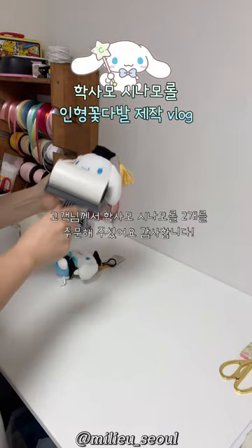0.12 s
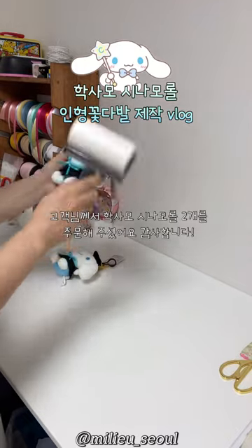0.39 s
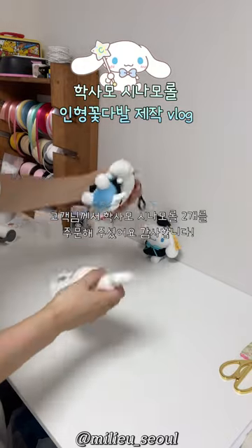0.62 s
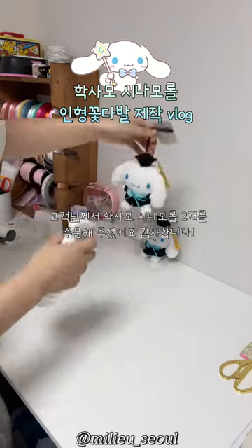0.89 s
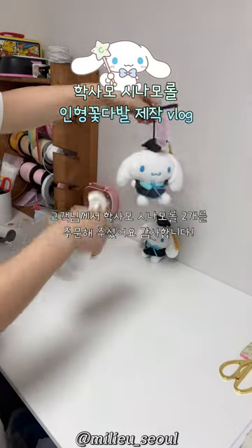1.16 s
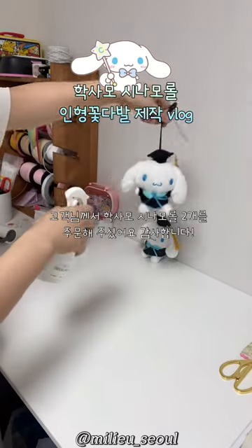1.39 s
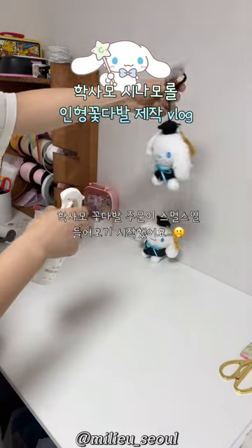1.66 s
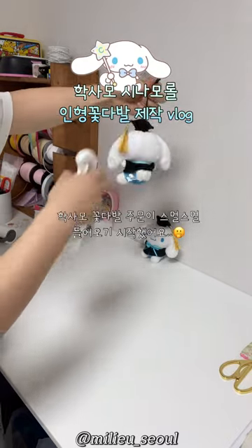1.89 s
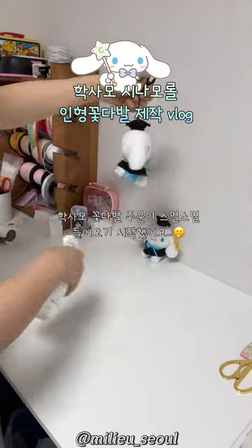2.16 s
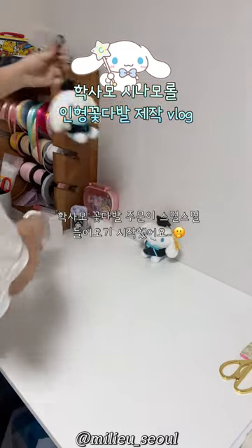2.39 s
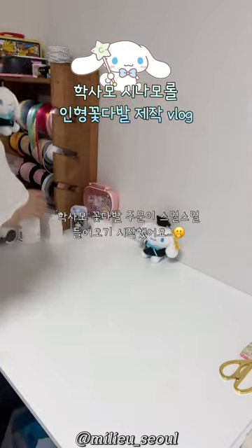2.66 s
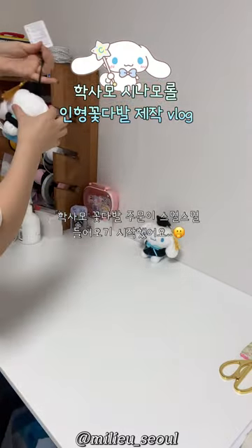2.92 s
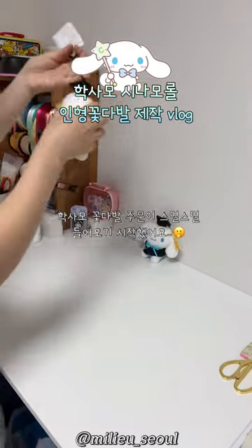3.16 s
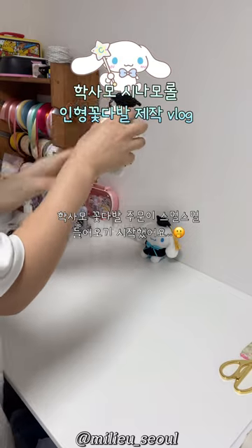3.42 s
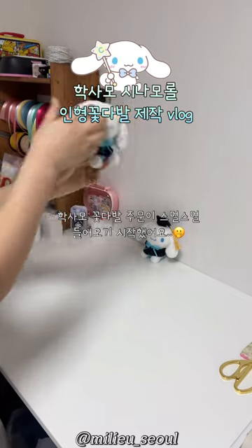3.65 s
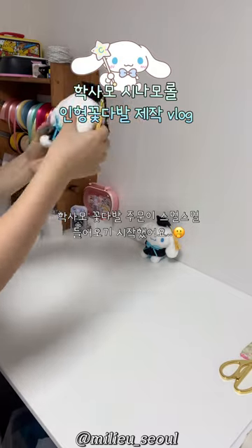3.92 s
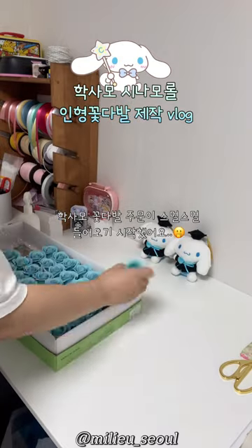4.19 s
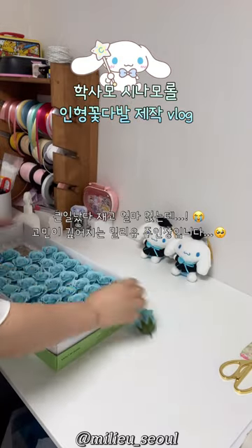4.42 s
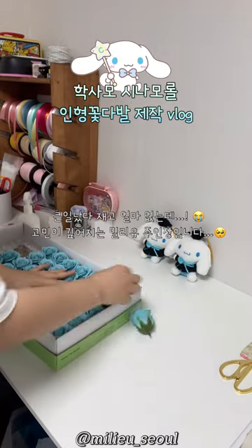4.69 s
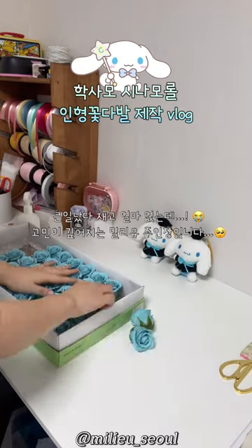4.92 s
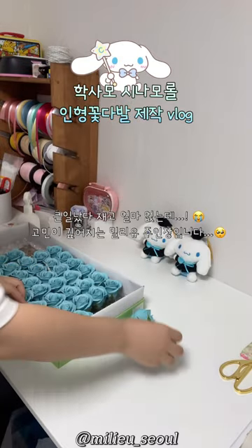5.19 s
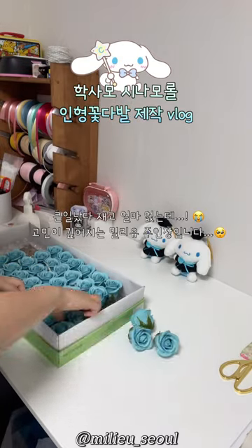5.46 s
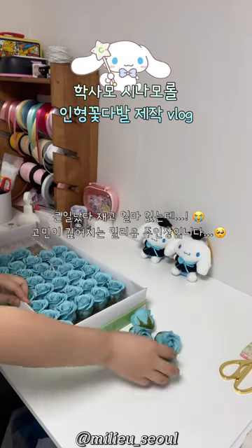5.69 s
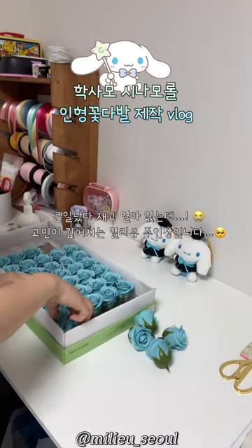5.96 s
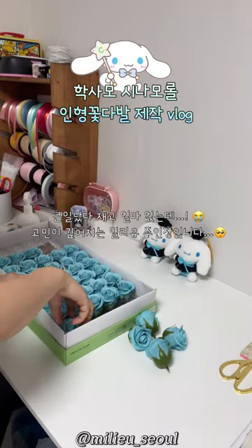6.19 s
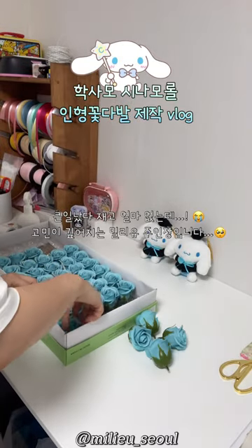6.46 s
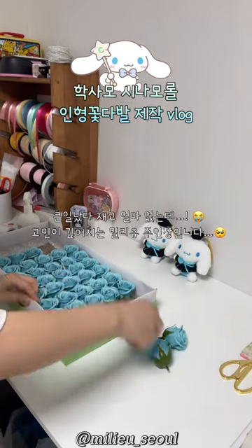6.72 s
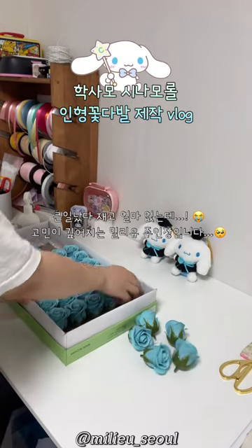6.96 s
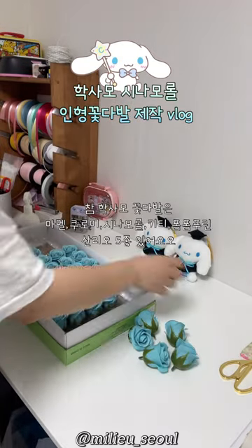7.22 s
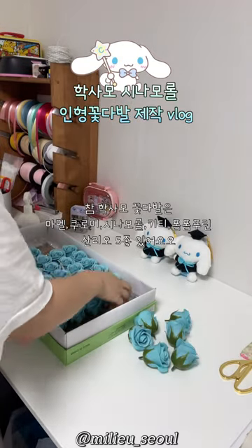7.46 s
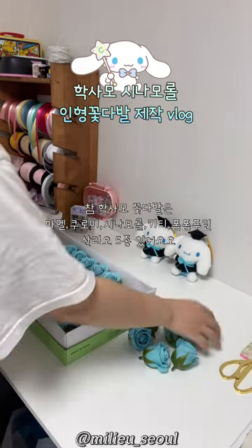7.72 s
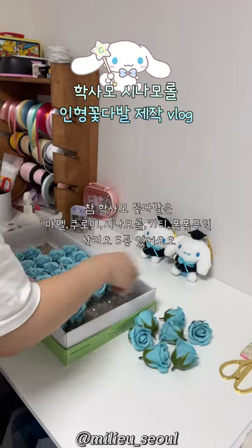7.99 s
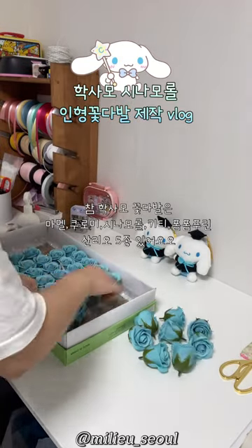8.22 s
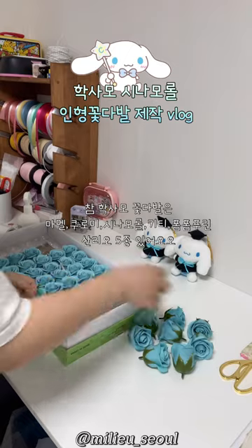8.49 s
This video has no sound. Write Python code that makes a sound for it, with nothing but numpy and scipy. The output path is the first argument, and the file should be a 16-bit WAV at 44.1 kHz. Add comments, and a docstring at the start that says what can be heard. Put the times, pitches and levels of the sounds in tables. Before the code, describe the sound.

Close to the microphone in a small workroom, hands handle light things with small plastic clicks, and a spray bottle gives two very short puffs. The bottle knocks and scrapes onto the table. After a quieter pause with a few ticks, a thin plastic tray snaps loudly and crackles in uneven bursts as artificial roses are pulled out, with soft rustles and dull box bumps. Faint hum and hiss continue underneath.

```python
"""Artificial roses are pulled from a thin plastic tray, whose buckling radiates snaps: short bursts of noise
with a hollow ring. Before that, hands brush and spray plush toys (shaped noise) and a spray bottle is set
down on the table, whose modes ring under each blow. Strokes crackle as trains of uneven grains.
A faint machine hum and hiss, both filtered noise, fill the small workroom; its walls answer briefly."""
import sys
import numpy as np
from scipy import signal
from scipy.fft import rfft, irfft, next_fast_len
from scipy.io import wavfile
from scipy.ndimage import uniform_filter1d, map_coordinates

SR = 44100
rng = np.random.default_rng(int(sys.argv[2]) if len(sys.argv) > 2 else 0)


def volts_from_decibels(level):
    """Turn decibel levels (scalar or array-like) into linear amplitude factors."""
    exponent = np.asarray(level, float) / 20
    return 10 ** exponent


def put_to_file(sound):
    """Save the sound as 16-bit audio at rate SR, in the file named by the first command-line argument."""
    columns = np.atleast_2d(sound).T  # one column per channel
    safe = np.clip(columns, -1, 1)
    whole_steps = np.round(safe * 32767)
    wavfile.write(sys.argv[1], SR, whole_steps.astype(np.int16))


N = 379701


def unit(x):
    """Normalisation: scales a signal to rms 1."""
    return x / np.sqrt(np.mean(x ** 2) + 1e-20)


def along(points, hz):
    """Logarithmic pitch scale: interpolates (f/Hz, value) points over log frequency."""
    f, value = np.transpose(points)
    return np.interp(np.log(hz + 1), np.log(f + 1), value)


def curves(rows):
    """Envelope: one value per sample for each column after the time; -120 outside."""
    s, *columns = np.transpose(rows)
    return [np.interp(np.arange(N) / SR, s, c, left=-120, right=-120) for c in columns]


def filtered(x, response):
    """Linear filtering: the spectrum of x times a complex response of frequency."""
    size = next_fast_len(x.shape[-1] + 8192)
    spectrum = rfft(x, size) * response(np.fft.rfftfreq(size, 1 / SR))
    return irfft(spectrum, size)[..., :x.shape[-1]]


def resonant(modes):
    """Modal superposition: causal response of (f/Hz, width/Hz, level/dB) resonances of alternating sign."""
    def response(f):
        return sum((-1) ** k * volts_from_decibels(db) * 1j * f * width / (centre ** 2 - f * f + 1j * f * width)
                   for k, (centre, width, db) in enumerate(modes))
    return response


def noise(spectrum, grit_db, per_s):
    """Modulated noise: coloured, rms 1, its level gliding between per_s random values a second."""
    drift = map_coordinates(rng.standard_normal(N), [np.arange(N) * per_s / SR], order=1)
    coloured = filtered(rng.standard_normal(N), lambda hz: volts_from_decibels(along(spectrum, hz)))
    return unit(volts_from_decibels(grit_db * drift) * coloured)


# machine tones: f/Hz, width/Hz, level/dB
HUM = [(118, 12, -70), (3758, 40, -88), (4760, 120, -92), (5050, 40, -89)]
# colour of the room hiss: f/Hz, relative level/dB
AIR = [(30, -41), (55, -15.5), (118, -7.5), (200, -18), (490, -25), (850, -32), (2600, -42.5), (4500, -38),
       (7000, -44), (16000, -43.5)]
# stereo spread of the hiss: f/Hz, side over mid amplitude
AIR_APART = [(100, .1), (400, .55), (1300, 1.9), (4400, 1.1), (15000, .15)]


def air():
    """Stationary noise: diffuse hiss, with the wavering hum and whine of a machine as narrow bands."""
    hiss_db = -65
    hum = 0
    for hz, width, db in HUM:
        hum = hum + volts_from_decibels(db) * unit(filtered(rng.standard_normal(N), resonant([(hz, width, 0)])))
    mid, side = (noise(AIR, grit_db=1.5, per_s=8) for _ in range(2))
    side = filtered(side, lambda hz: along(AIR_APART, hz))
    return hum + volts_from_decibels(hiss_db) * np.array([mid + side, mid - side])


# decay of the near walls' answer: f/Hz, t60/s
WALLS = [(300, 0.17), (1400, 0.023), (3700, 0.064), (10000, 0.048)]
# stereo spread of the echoes: f/Hz, side over mid amplitude
APART = [(200, .02), (1000, .25), (4400, 0.99), (14000, 0.28)]


def room(x, piece=2048):
    """Reverberation: each moment gets its own short noise tail, each frequency dying at its own speed."""
    pieces = np.pad(x, (0, -N % piece)).reshape(-1, piece)
    hz, t, z = signal.stft(rng.standard_normal((2, len(pieces), 3 * piece)), SR, nperseg=128)
    z[1] *= along(APART, hz)[:, None]
    # near walls answer first; the whole room hums on more faintly
    near_walls = volts_from_decibels(-60 * t / along(WALLS, hz)[:, None])
    whole_room = volts_from_decibels(-30 - 60 * t / .3) * np.cos(t / t[-1] * np.pi / 2)
    tails = signal.istft(z * (near_walls + whole_room), SR, nperseg=128)[1][..., :3 * piece]
    tails = tails / np.linalg.norm(tails[0], axis=-1, keepdims=True)
    wet = signal.fftconvolve(pieces[None], tails, axes=2)
    out = np.zeros((2, (len(pieces) + 4) * piece))
    for k, tail in enumerate(wet.swapaxes(0, 1)):
        out[:, k * piece:][:, :tail.shape[1]] += tail
    delay = round(.0025 * SR)
    mid, side = np.pad(out, ((0, 0), (delay, 0)))[:, :N]
    return np.array([mid + side, mid - side])


# modes of the table top: f/Hz, level/dB, t60/s
TABLE = [(128, -21, .14), (238, -12, .08), (281, 0, .19), (490, -14, .04), (780, -13, .035),
         (1300, -16, .02)]


def wood(force, spread_db=0):
    """Forced vibration: a force drives the table's modes; the spot struck sets their strengths."""
    modes = []
    for hz, db, t60 in TABLE:
        width = np.log(1000) / (np.pi * t60)
        modes.append((hz, width, db + spread_db * rng.standard_normal()))
    return filtered(force, resonant(modes))


def knocks(rows, stop_s, spread_db, rattle_db=-120):
    """Impact: a soft push rings the table until something resting on it damps the modes."""
    rattle_s = .015  # a light thing does not land at once: uneven pushes follow the first
    out, t = np.zeros(N + SR), np.arange(SR // 5) / SR
    for s, db, free_s, soft_s in rows:
        late = rattle_s * rng.random((4, 1))
        size = volts_from_decibels(rattle_db) * rng.standard_normal((4, 1))
        first = np.exp(-(t / soft_s - 2) ** 2)
        later = (size * np.exp(-((t - late) / soft_s - 2) ** 2)).sum(axis=0)
        ring = wood(first + later, spread_db)
        damping = np.exp(-np.clip(t - free_s, 0, None) / stop_s)
        out[round(s * SR):][:len(t)] += volts_from_decibels(db) * ring / np.std(ring[:SR // 50]) * damping
    return out[:N]


# colour of a click's bright burst: f/Hz, relative level/dB
CRACK = [(150, -46.5), (700, -17), (1500, -4), (2600, 3), (5500, -2.5), (8000, -1.5), (13000, -2),
         (15600, -5), (16500, -67.5)]


def clicks(rows, hollow, t60, colour_db, crack_db, body_db):
    """Transient radiation: a short bright burst with its own strongest band, a duller one in the hollow."""
    spike_db, spike_t60_s = 4, 0.0069  # the first break stands out of its burst
    out, t = np.zeros(N + SR), np.arange(SR // 20) / SR
    for s, db, bright_hz, low_db in rows:
        decay = volts_from_decibels(-60 * t / [[t60], [1.41 * t60]])
        burst = rng.standard_normal((2, len(t))) * decay * (1 - np.exp(-t / 0.0002))
        burst[0] *= 1 + volts_from_decibels(spike_db - 60 * t / spike_t60_s)
        colour = resonant([(bright_hz, 0.16 * bright_hz, colour_db)])
        crack = filtered(burst[0], lambda hz: volts_from_decibels(along(CRACK, hz)) + colour(hz))
        body = filtered(burst[1], resonant(hollow))
        hit = volts_from_decibels(crack_db) * crack / np.abs(crack).max()
        hit = hit + volts_from_decibels(low_db + body_db) * body / np.abs(body).max()
        out[round(s * SR):][:len(t)] += volts_from_decibels(db) * hit
    return out[:N]


def with_hollow(rows, top_db, per_db, scatter_db):
    """Hardness law: the harder a click, the brighter; the hollow gains per_db for each dB softer."""
    luck = rng.standard_normal(len(rows))
    return [(s, db, hz, top_db - per_db * db + scatter_db * u) for (s, db, hz), u in zip(rows, luck)]


# bands that grains favour, one each: f/Hz
GRAIN_HZ = [1900, 3000, 4600, 7480, 12000]


def crackle(spectrum, per_s, spread_db, bed_db):
    """Granular noise of rms 1: tiny breaks of very uneven size and colour over a smooth bed."""
    peak_db, grain_t60_s = 2, 0.01
    sizes = volts_from_decibels(spread_db * np.minimum(rng.exponential(size=N), 2.5))
    breaks = (rng.random(N) < per_s / SR) * sizes
    family = rng.integers(len(GRAIN_HZ), size=N) == np.arange(len(GRAIN_HZ))[:, None]
    shape = signal.lfilter([1], [1, -volts_from_decibels(-60 / SR / grain_t60_s)], breaks * family)
    grains = unit(shape) * np.sqrt(1 / len(GRAIN_HZ)) * rng.standard_normal(N)
    tinted = filtered(grains, lambda hz: [1 + resonant([(c, .35 * c, peak_db)])(hz) for c in GRAIN_HZ])
    mixed = tinted.sum(axis=0) + volts_from_decibels(bed_db) * rng.standard_normal(N)
    return unit(filtered(mixed, lambda hz: volts_from_decibels(along(spectrum, hz))))


# length and level of each spray: t/s, length/s, hiss level/dB
SPRAY = [(1.054, 0.066, -37), (1.949, 0.062, -38)]
# colour of the mist: f/Hz, relative level/dB
MIST = [(470, -61), (800, -28), (1780, -15.5), (13000, -2), (15900, -2.5), (16500, -36.5)]


def spray():
    """Jet noise: the trigger clacks as a damped sine, then mist hisses while the pump stroke lasts."""
    clack_hz, clack_db, clack_t60_s = 1194, -35, 0.036
    t, gate, clack = np.arange(N) / SR, np.zeros(N), np.zeros(N)
    for s, length, db in SPRAY:
        age = np.clip(t - s, 0, None)
        fall_db = 700 * np.clip(age - length, 0, None)
        gate += volts_from_decibels(db - fall_db) * (1 - np.exp(-age / 0.02))
        clack += volts_from_decibels(clack_db - 60 * age / clack_t60_s) * np.sin(2 * np.pi * clack_hz * age)
    return gate * noise(MIST, grit_db=1, per_s=300) + clack


# clear clicks of toys, tags and bottle in the hands: t/s, nominal level/dB, brightest f/Hz
TICKS = [(0.076, -33, 6800), (0.1532, -43, 2230), (0.1955, -42, 14400), (0.299, -43, 4740),
         (0.3394, -49.5, 2370), (0.435, -40.5, 5190), (0.4552, -41.5, 4000), (0.5275, -33, 5900),
         (0.674, -43, 2430), (0.704, -27, 4170), (0.712, -23.5, 2350), (0.7908, -33.5, 3940),
         (0.8056, -14, 4860), (0.8789, -43.5, 4900), (0.8924, -43, 3800), (0.9353, -44, 3850),
         (0.9664, -42, 11500), (0.978, -34.5, 8240), (1.0241, -34, 4940), (1.0528, -21.5, 4070),
         (1.2058, -42.5, 9400), (1.264, -41.5, 2280), (1.292, -49, 2890), (1.3935, -40, 8000),
         (1.516, -42, 4230), (1.527, -36, 4230), (1.6943, -45, 3770), (1.783, -51.5, 7740),
         (1.8836, -40.5, 3760), (1.9313, -36.5, 4820), (1.952, -23.5, 13800), (2.1168, -46, 5460),
         (2.154, -47.5, 7000), (2.377, -38, 10600), (2.397, -34, 3560), (3.2124, -27, 4730),
         (3.3207, -33, 4300), (3.3544, -24, 2710), (3.4346, -39.5, 3820), (3.7016, -36.5, 5450),
         (3.7983, -45, 2640), (3.9285, -38.5, 2370), (4.0277, -27, 4600), (4.0632, -41.5, 2410)]
# hollow plastic of roller and bottle: f/Hz, width/Hz, level/dB
SHELL = [(670, 100, 2), (1330, 110, -4.5)]


def ticks():
    """Contact transients: light things click in the hands and excite hollow plastic."""
    rows = with_hollow(TICKS, top_db=-19.5, per_db=0.044, scatter_db=1.7)
    return clicks(rows, SHELL, t60=0.026, colour_db=6, crack_db=-2.5, body_db=-6.5)


# the bottle's foot strikes the table: t/s, level/dB, time until its weight stops the ring/s, clack level/dB
BOTTLE = [(2.4625, -19, .02, -20), (2.536, -33, .03, -36), (2.584, -25, .011, -23), (2.5955, -19, .11, -21)]
# the bottle slides: t/s, table rumble level/dB, scrape level/dB
DRAG = [(2.46, -54.5, -35.5), (2.49, -44.5, -45.5), (2.53, -39.5, -44), (2.555, -32, -38.5),
        (2.575, -45.5, -52), (2.635, -33.5, -44), (2.67, -59, -79)]
# colour of the scrape: f/Hz, relative level/dB
SCRAPE = [(600, -25), (1200, -5.5), (2300, -1.5), (4000, -6), (16000, -23.5)]


def bottle():
    """Impact and friction: blows on the table, each with the foot's dull clack, and a rough slide."""
    rumble_db, scrape_db = curves(DRAG)
    rubbing = noise([(100, 9), (2000, 2.5)], grit_db=-1, per_s=390)
    rumble = volts_from_decibels(rumble_db) * unit(wood(rubbing))
    scrape = volts_from_decibels(scrape_db) * crackle(SCRAPE, per_s=1100, spread_db=9.5, bed_db=-5.5)
    contact_s = .0003
    blows = knocks([(*row[:3], contact_s) for row in BOTTLE], stop_s=.004, spread_db=0)
    foot_rows = [(s, db, 2200, -3) for s, _, _, db in BOTTLE]
    foot = clicks(foot_rows, SHELL, t60=0.0084, colour_db=28.5, crack_db=0.5, body_db=-5.5)
    return blows + foot + rumble + scrape


# strokes of the hands over plush, then over petals and tray: start t/s, end t/s, rustle level/dB
STROKES = [(0, 0.017, -51.5), (0.057, 0.174, -61.5), (0.424, 0.647, -67), (0.958, 1.02, -60),
           (2.299, 2.359, -66), (2.377, 2.424, -53.5), (3.54, 3.644, -73.5), (3.866, 3.888, -65.5),
           (4.111, 4.15, -40.5), (4.132, 4.188, -55.5), (4.192, 4.253, -64.5), (4.279, 4.368, -59.5),
           (4.471, 4.589, -46), (4.604, 4.689, -45.5), (4.703, 4.882, -56.5), (4.901, 5.018, -55.5),
           (5.028, 5.081, -39), (5.192, 5.255, -52.5), (5.351, 5.432, -55.5), (5.436, 5.541, -45),
           (5.657, 5.884, -53), (5.894, 6.192, -57.5), (6.19, 6.437, -55.5), (6.46, 6.505, -50),
           (6.521, 6.63, -46.5), (6.734, 6.797, -57), (6.893, 6.995, -53), (7.013, 7.143, -56),
           (7.128, 7.189, -44), (7.328, 7.36, -69), (7.438, 7.509, -50.5), (7.556, 7.562, -34),
           (7.681, 7.751, -69), (7.857, 7.907, -54), (7.917, 7.978, -47), (8.086, 8.231, -63.5),
           (8.27, 8.365, -56), (8.383, 8.442, -45.5), (8.537, 8.601, -60.5)]


def stroking():
    """Amplitude envelope: the hands' rubbing at each sample, its edges smoothed."""
    level = np.zeros(N)
    for start, end, db in STROKES:
        level[round(start * SR):round(end * SR)] += volts_from_decibels(db)
    return uniform_filter1d(level, round(0.013 * SR))


def patchy(x, depth_db):
    """Time-frequency modulation: random gain in patches over a kilohertz wide and about 40 ms long."""
    z = signal.stft(x, nperseg=256)[2]
    field = uniform_filter1d(rng.standard_normal(z.shape), size=8, axis=0)
    field = uniform_filter1d(field, size=14, axis=1)
    return unit(signal.istft(z * volts_from_decibels(depth_db * unit(field)), nperseg=256)[1][:N])


# colour of the rustle: f/Hz, relative level/dB
RUSTLE = [(1000, -31), (1800, 6.5), (5200, 3), (8000, -0.5), (13000, -1.5), (15800, -4), (16500, -32)]
# hollow of tray and box: f/Hz, width/Hz, level/dB
BODY = [(706, 270, -16.5), (1298, 310, 12.5), (390, 170, 3)]


def hands():
    """Friction: each stroke crackles, and rubs the hollow tray and the table under it."""
    tray_from_s = 4.106  # the box of roses is on the table from here on
    petals_db = -73.5  # from then on the roses never quite stop rustling
    plush_hollow_db, tray_hollow_db = -12, 0.5  # hollow rub relative to the stroke
    flex_db = -36.5
    level, on_tray = stroking(), np.arange(N) > tray_from_s * SR
    rustle = level + volts_from_decibels(petals_db) * on_tray
    hollow = level * volts_from_decibels(np.where(on_tray, tray_hollow_db, plush_hollow_db))
    rub = crackle([(100, 0), (2000, -1)], per_s=250, spread_db=4, bed_db=0)
    rumble = unit(filtered(rub, resonant(BODY))) + volts_from_decibels(-12.5) * unit(wood(rub))
    # the whole table top flexes, growing only as the root of the rubbing
    deepest = unit(filtered(rub, resonant([(128, 20, 0)])))
    flex = volts_from_decibels(flex_db) * np.sqrt(np.abs(hollow)) * deepest
    grains = patchy(crackle(RUSTLE, per_s=200, spread_db=11, bed_db=-0.5), depth_db=2)
    return rustle * grains + hollow * rumble + flex


# box and roses bump the table: t/s, level/dB, contact/s
BUMPS = [(4.334, -48, 0.00048), (4.506, -39.5, 0.00029), (4.663, -60.5, 0.00031), (4.78, -42, 0.00017),
         (4.924, -51.5, 0.00016), (5.079, -40.5, 0.00015), (5.214, -48, 0.00026), (5.499, -56.5, .0004),
         (5.704, -51, 0.00057), (5.83, -46.5, .0005), (5.843, -42, 0.0035), (6.772, -51.5, .0005),
         (6.956, -44.5, 0.00028), (7.194, -45, 0.00037), (7.342, -40, 0.0004), (7.381, -46, 0.00071),
         (7.554, -49.5, 0.0011), (7.707, -51, 0.0011), (7.976, -52.5, 0.00069), (8.56, -56, 0.0011)]
# the cardboard's broad resonances, applied twice: f/Hz, width/Hz, level/dB
BOX = [(330, 220, 0), (700, 300, -1)]


def box():
    """Heavily damped body: the cardboard box thuds without pitch at every bump."""
    over_bump_db, t60_s = 3, .06
    blows = np.zeros(N)
    blows[[round(s * SR) for s, _, _ in BUMPS]] = [volts_from_decibels(db + over_bump_db) for _, db, _ in BUMPS]
    envelope = signal.lfilter([1], [1, -volts_from_decibels(-60 / SR / t60_s)], blows)
    return envelope * unit(filtered(rng.standard_normal(N), lambda hz: resonant(BOX)(hz) ** 2))


# clear bucklings of the plastic tray: t/s, nominal level/dB, brightest f/Hz
SNAPS = [(4.1295, -1, 8040), (4.3277, -26, 3400), (4.4727, -21, 3950), (4.5027, -16, 2320),
         (4.5341, -41, 2400), (4.6234, -6, 2530), (4.6385, -10.5, 9470), (4.6441, -2, 2470),
         (4.6744, -26, 2750), (4.7762, -43.5, 3850), (4.9203, -19.5, 2140), (5.0291, -9, 2530),
         (5.0598, -8.5, 13460), (5.0851, -16.5, 2150), (5.2124, -32, 1870), (5.2822, -41, 2170),
         (5.3517, -20, 2120), (5.3696, -18.5, 5550), (5.4793, -9.5, 6740), (5.5219, -17, 12600),
         (5.67, -27, 4020), (5.8581, -31.5, 2130), (6.0546, -32, 2130), (6.086, -32.5, 1820),
         (6.135, -29.5, 2090), (6.1983, -20, 3720), (6.2109, -17.5, 3750), (6.2223, -32.5, 3090),
         (6.2505, -33.5, 7840), (6.2631, -24, 3780), (6.333, -26.5, 2160), (6.4521, -13.5, 3460),
         (6.5271, -17, 1936), (6.5418, -16, 2970), (6.5935, -11.5, 3780), (6.7359, -32, 3800),
         (6.7691, -22, 3380), (6.9192, -26, 2260), (6.9517, -26, 3650), (6.9715, -27, 4580),
         (7.0748, -25, 1800), (7.1087, -28.5, 3940), (7.1326, -11.5, 8470), (7.1405, -3.5, 7410),
         (7.1524, -11.5, 7840), (7.1908, -21.5, 2180), (7.3447, -21, 6940), (7.3777, -31, 6830),
         (7.45, -25.5, 1823), (7.5168, -16.5, 1844), (7.5288, 2, 12900), (7.6995, -29.5, 3186),
         (7.875, -23.5, 4160), (7.9234, -10, 2130), (7.9278, -12, 12600), (7.9364, 2.5, 8170),
         (7.9724, -23, 5630), (8.0954, -39, 3270), (8.1212, -34, 4000), (8.1475, -34.5, 2150),
         (8.1708, -38, 3870), (8.2722, -33, 2110), (8.313, -22.5, 2090), (8.3214, -21.5, 2230),
         (8.3649, -25, 2110), (8.4086, 1.5, 12290), (8.4138, -5.5, 4120), (8.5654, -29, 4180)]


def tray():
    """Snap-through buckling: snaps of the tray, which shake the table, and bumps on the table."""
    shake_db, shake_contact_s = -52.5, .0004  # how much of a snap rings the table, and its push
    rows = with_hollow(SNAPS, top_db=-18.5, per_db=0.35, scatter_db=1.33)
    snaps = clicks(rows, BODY, t60=0.021, colour_db=5.5, crack_db=-2.5, body_db=-1.0)
    pushes = BUMPS + [(s, db + shake_db, shake_contact_s) for s, db, _ in SNAPS]
    # a slower, heavier landing rings longer before the hand damps it
    blows = [(s, db, .012 + 12 * soft_s, soft_s) for s, db, soft_s in pushes]
    return snaps + knocks(blows, stop_s=.015, spread_db=8, rattle_db=-7.5)


def scene():
    """Superposition: near sounds reach both ports alike; the room, too small to echo the bass, parts them."""
    near = ticks() + tray() + box() + bottle() + spray() + hands()
    echoes = filtered(room(near), lambda hz: hz ** 2 / (hz ** 2 + 600 ** 2))
    return near + volts_from_decibels(-2.0) * echoes + air()


def band_limit(x):
    """A steep low-pass at the top of the band."""
    return signal.sosfilt(signal.butter(12, 17000, fs=SR, output="sos"), x)


def record(dry):
    """High-pass and saturation: the microphone drops the deepest bass, the input clips at full scale."""
    heard = filtered(dry, lambda hz: (1j * hz / (1j * hz + 50)) ** 3)
    return band_limit(np.clip(heard, -1, 1))


dry = scene()
out = record(dry)
put_to_file(out)
```